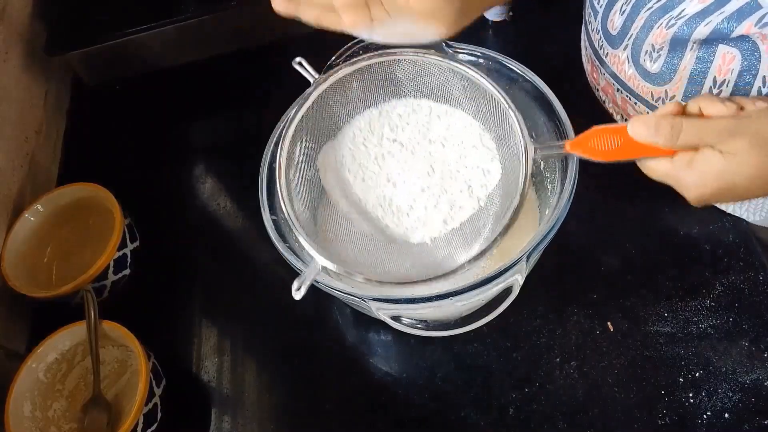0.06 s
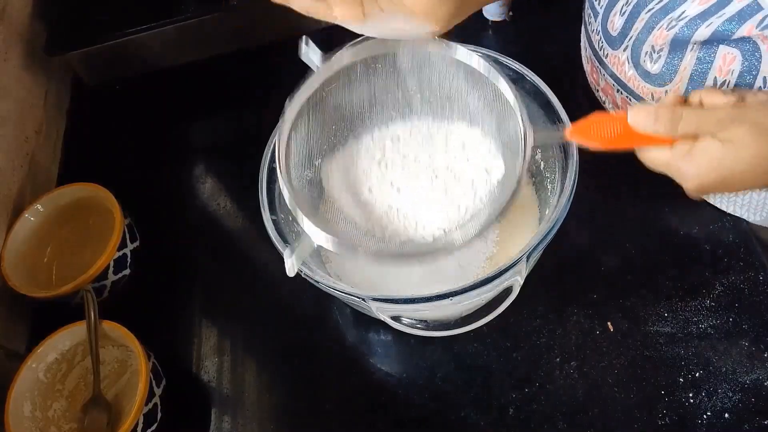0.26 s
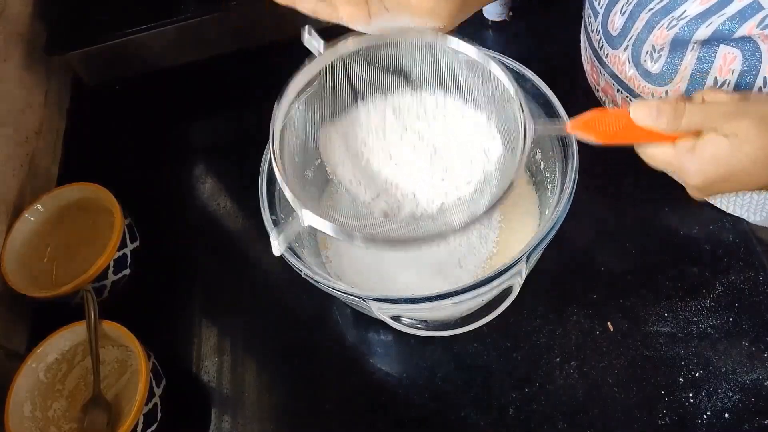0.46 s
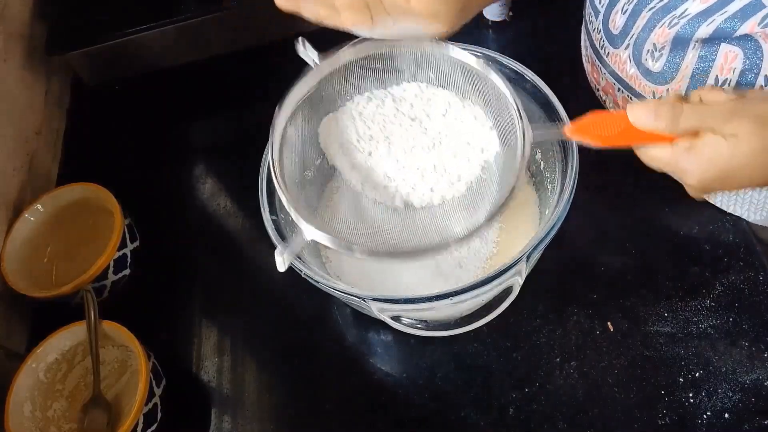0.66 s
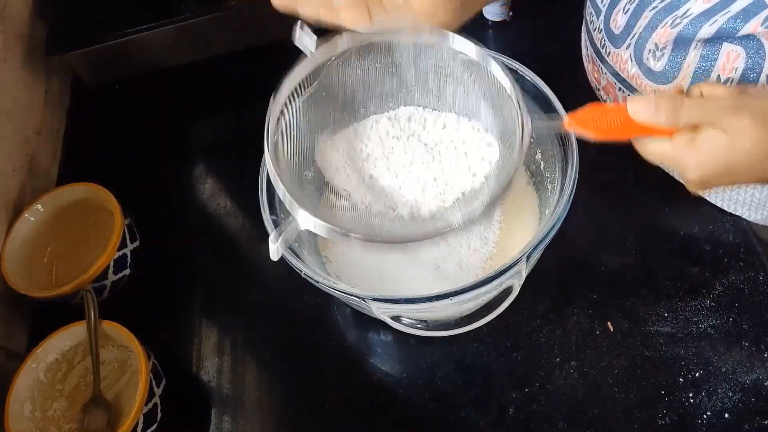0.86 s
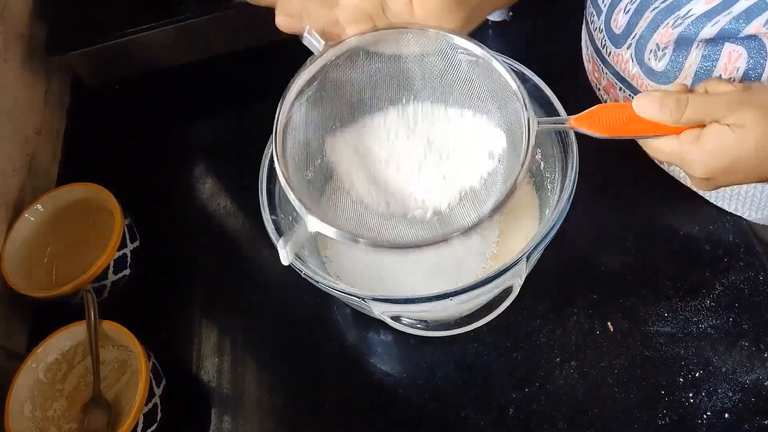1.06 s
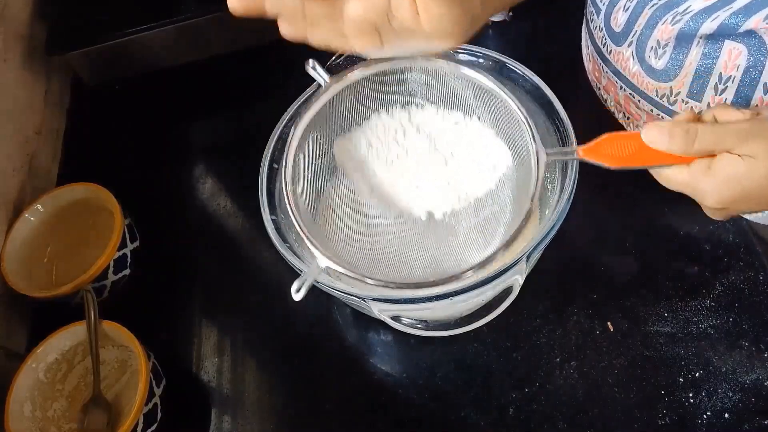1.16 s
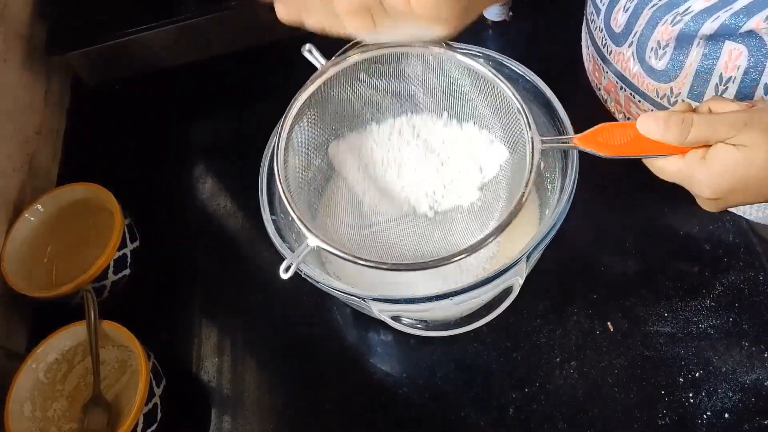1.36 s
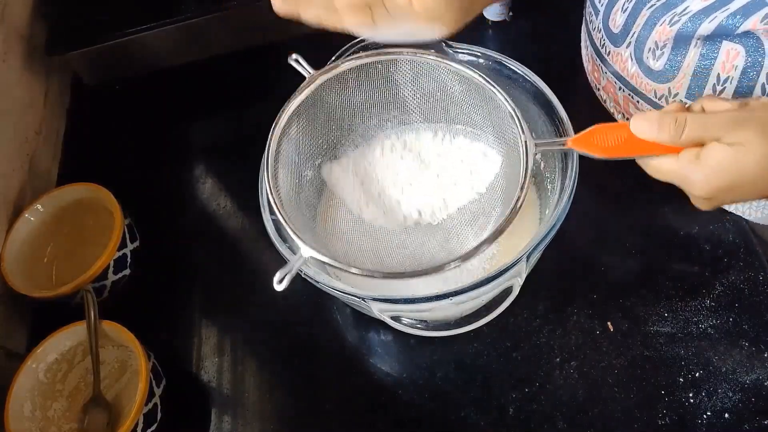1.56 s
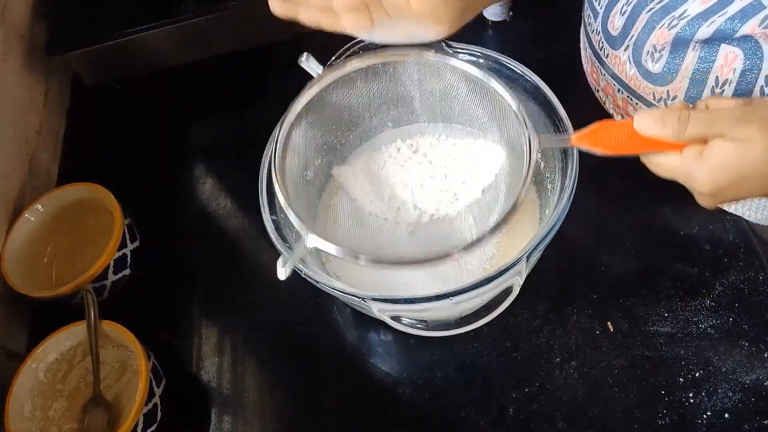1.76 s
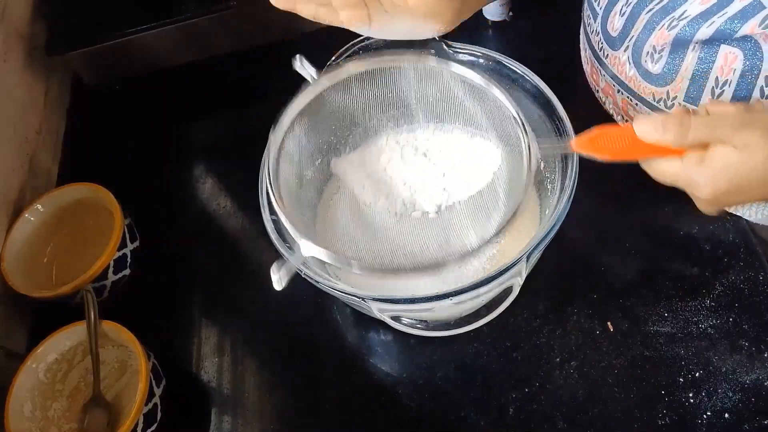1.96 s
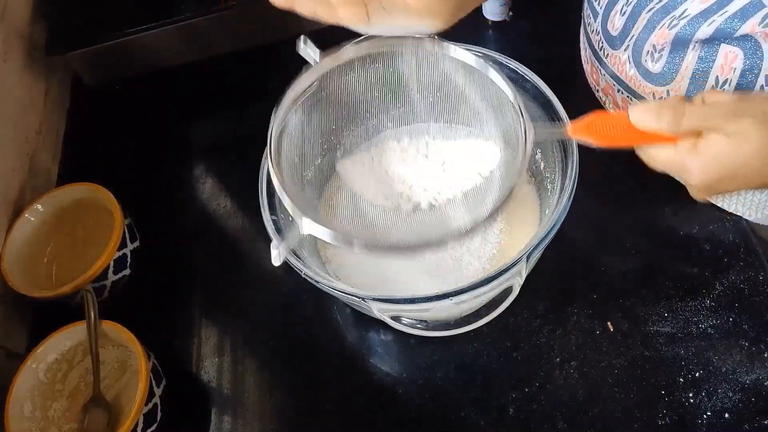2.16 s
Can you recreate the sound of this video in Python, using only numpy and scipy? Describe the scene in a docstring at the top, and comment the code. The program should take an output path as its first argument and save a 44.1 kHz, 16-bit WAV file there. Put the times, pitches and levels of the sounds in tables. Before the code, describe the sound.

Flour is sifted through a steel mesh sieve, close up in a small kitchen. Bright gritty swishes begin at once; at 0.25 seconds the rim hits the glass bowl with a loud, sharp, rattling clink that dies within about 0.2 seconds. A weaker shake follows near 0.55, then steady crisp swishes with faint dull palm thuds about every 0.2 seconds until 2.1, over faint room hum.

```python
"""Sifting flour over a bowl

Flour is sifted over a glass bowl in a small kitchen. A steel sieve is knocked against a palm several times a second:
soft thuds are bursts of dull noise, and bright, grainy swishes are showers of tiny random impacts on the mesh.
Once the rim strikes the bowl: a few sharp clicks, dying sine rings, a dense noisy tail and two low thuds.
The room adds a short echo and a faint hum of filtered noise."""
import sys
import numpy as np
from scipy import signal
from scipy.fft import rfft, irfft
from scipy.io import wavfile

SR = 44100
rng = np.random.default_rng(int(sys.argv[2]) if len(sys.argv) > 2 else 0)


def dump(signal):
    """Clip the signal to [-1, 1] and save it as 16-bit WAV at the path in sys.argv[1]."""
    limited = np.clip(np.atleast_2d(signal).T, -1, 1)
    pcm = np.round(limited * 32767).astype(np.int16)
    wavfile.write(sys.argv[1], SR, pcm)


N = 97020  # length in samples: 2.2 s


def from_db(db):
    """Turn decibels into a gain."""
    return 10 ** (np.asarray(db) / 20)


def rms_one(x):
    """Scale a signal to an rms (average strength) of 1."""
    return x / np.sqrt(np.mean(x ** 2) + 1e-20)


def coloured(x, points):
    """Filter a sound to follow a table of (pitch_hz, level_db), with a response of unit energy."""
    size = 8192
    pitch_hz, level_db = np.transpose(points)
    grid_hz = np.maximum(np.arange(size // 2 + 1) * SR / size, 1)
    gain = from_db(np.interp(np.log(grid_hz), np.log(pitch_hz), level_db))
    # fold the cepstrum onto positive times, so that the filter responds only after its input
    cepstrum = irfft(np.log(gain))
    cepstrum[1:size // 2] *= 2
    cepstrum[size // 2 + 1:] = 0
    response = irfft(np.exp(rfft(cepstrum)))
    return signal.fftconvolve(x, response / np.linalg.norm(response))[:N]


def ringing(x, modes):
    """Let each mode (one way of vibrating) ring as a dying sine whenever it is struck."""
    out = np.zeros(N)
    for pitch_hz, level_db, ring_s in modes:
        decay = from_db(-60 / (ring_s * SR))  # loss per sample
        turn = 2 * np.pi * pitch_hz / SR  # radians per sample
        feedback = [1, -2 * decay * np.cos(turn), decay * decay]
        out += from_db(level_db) * signal.lfilter([0, np.sin(turn)], feedback, x + 1e-18)
    return out


def swell(start_s, rise_s, hold_s, fall_s):
    """Climb 20 dB per rise time up to the start, hold, then lose 20 dB in each fall time."""
    t = np.arange(N) / SR - start_s
    before = np.maximum(-t, 0) / rise_s
    after = np.maximum(t - hold_s, 0) / fall_s
    return from_db(-20 * (before + after))


def joined_swells(table):
    """Add up the power of all swells in a table, and return the combined strength."""
    power = 0
    for start_s, rise_s, hold_s, fall_s, level_db in table:
        power = power + (from_db(level_db) * swell(start_s, rise_s, hold_s, fall_s)) ** 2
    return np.sqrt(power)


def grains(per_s, spread_db):
    """Scatter tiny impulses of uneven size and random sign, with an rms of 1."""
    sizes = from_db(spread_db * np.minimum(rng.exponential(1, N), 4))
    signs = rng.choice([-1, 1], N)
    lands = rng.random(N) < per_s / SR
    return rms_one(sizes * signs * lands)


def flutter(hz):
    """Smooth noise into a random wavering with a spread of 1."""
    low_pass = signal.butter(2, hz, fs=SR, output="sos")
    return rms_one(signal.sosfilt(low_pass, rng.standard_normal(N)))


# Colour of the still air of the kitchen: (pitch_hz [Hz], level_db [dB, relative])
HUM_COLOUR = [(20, -19), (45, -25.5), (70, -10), (105, 1), (170, -4.5), (300, -3.5), (460, -15), (800, -11),
              (1400, -16), (2500, -21), (5000, -22.5), (6500, -24), (8500, -43), (15500, -35.5)]
HUM_DB = -59


def room_hum():
    """The still air of the kitchen is faint, steady filtered noise."""
    return from_db(HUM_DB) * coloured(rng.standard_normal(N), HUM_COLOUR)


# Flour thrown across the mesh:
# (start_s [s, at full flow], rise_s [s per 20 dB], hold_s [s], fall_s [s per 20 dB], level_db [dB])
FLOUR_SHAKES = [(0.025, 0.039, 0.0063, 0.035, -37), (0.081, .008, 0.0044, 0.022, -48.5),
                (0.179, 0.018, 0.0086, 0.055, -42.5), (0.2, 0.031, 0.016, .055, -36.5),
                (0.534, 0.0095, 0.015, 0.07, -56.5), (0.595, 0.054, 0.042, 0.067, -61.5),
                (0.768, 0.016, 0.024, 0.03, -39.5), (0.93, 0.014, 0.051, 0.023, -35),
                (1.118, 0.021, 0.011, 0.028, -41.5), (1.158, 0.0081, 0.0033, 0.087, -53),
                (1.31, 0.0098, 0.0099, 0.033, -47.5), (1.34, 0.032, 0.014, 0.034, -37),
                (1.507, 0.015, 0.012, 0.035, -43), (1.531, 0.018, 0.0061, 0.047, -37.5),
                (1.686, 0.014, 0.039, 0.028, -39.5), (1.892, 0.04, 0.009, 0.039, -46),
                (1.959, 0.06, 0.013, 0.05, -59), (2.071, 0.023, 0.029, 0.043, -38)]
# Colour of flour on the mesh: (pitch_hz [Hz], level_db [dB, relative])
MESH_COLOUR = [(300, -25), (1000, -27.5), (2200, -25), (3000, -19.5), (3900, -11), (4600, -11),
               (5400, -7.5), (6050, -2.5), (6500, 4.5), (6850, -2), (7250, -4), (7750, -23.5), (8800, -33),
               (11000, -36.5), (15500, -42.5)]
GRAINS_PER_S, GRAIN_SPREAD_DB = 5000, 1.5
FLOW_FLUTTER_DB, FLUTTER_HZ = 0.5, 120


def flour():
    """Each shake drives a shower of grains over the wires, whose colour is bright."""
    flow = joined_swells(FLOUR_SHAKES)
    wavering = from_db(FLOW_FLUTTER_DB * flutter(FLUTTER_HZ))
    shower = flow * grains(GRAINS_PER_S, GRAIN_SPREAD_DB) * wavering
    return coloured(shower, MESH_COLOUR)


# Low thuds of the frame against the palm, and two under the clink: (start_s [s], level_db [dB, relative])
LOW_THUDS = [(0.015, -57), (0.187, -57), (0.255, -48.5), (0.293, -50), (0.568, -60.5), (0.773, -56),
             (0.925, -57), (0.968, -57), (1.147, -57), (1.341, -53), (1.535, -58.5), (1.715, -56),
             (1.903, -60.5), (2.094, -58.5)]
# Colour of a thud: (pitch_hz [Hz], level_db [dB, relative])
THUD_COLOUR = [(40, -29), (80, -1), (130, 1.5), (220, -3.5), (320, 0.5), (480, -10), (850, -9),
               (1500, -21.5), (4000, -63.5)]
THUD_RISE_S, THUD_T60_S = 0.00803, 0.23  # time constant of the rise; time to die by 60 dB


def low_thuds():
    """Soft, dull thuds, on the palm and under the clink: noise that builds quickly and dies away."""
    t, push = np.arange(N) / SR, 0
    for start_s, level_db in LOW_THUDS:
        age_s = np.maximum(t - start_s, 0)
        rise = 1 - np.exp(-age_s / THUD_RISE_S)
        decay = np.exp(-np.log(1000) * age_s / THUD_T60_S)
        push = push + from_db(level_db) * 2 * rise * decay
    return coloured(push * rng.standard_normal(N), THUD_COLOUR)


# The rim strikes the bowl and rebounds: (start_s [s], level_db [dB, relative])
RIM_STRIKES = [(0.2485, 4.5), (0.25, 10), (0.2512, 5), (0.2531, 8), (0.257, 2), (0.2589, 4.5)]
# The clink's dense, noisy tail holds, then dies quickly:
# (start_s [s, at full strength], rise_s [s per 20 dB], hold_s [s], fall_s [s per 20 dB], level_db [dB])
CLINK_TAILS = [(0.254, .002, .012, .05, -22.5), (0.289, 0.052, 0.037, 0.048, -23),
               (0.353, .03, .024, 0.028, -35)]
# Colour of the crack of steel on glass: (pitch_hz [Hz], level_db [dB, relative])
CRACK_COLOUR = [(35, -55), (100, -59.5), (400, -30.5), (620, -16), (950, -36), (1250, -13.5), (1450, -21.5),
                (1800, -10.5), (2650, -26), (3100, -6.5), (3400, -22), (4300, -18), (4850, -19.5),
                (5500, -14.5), (5850, 0), (6600, 0.5), (7150, 0.5), (7700, -18.5), (8200, -20), (8700, -30),
                (11000, -28), (12200, -33.5), (13200, -28), (13900, -39), (15200, -34.5)]
# Rings of rim and bowl: (pitch_hz [Hz], level_db [dB, relative], ring_s [s, to die by 60 dB])
RIM_RINGS = [(106.4, -64, .2), (353, -69, 0.04), (627, -58.5, 0.32), (1230, -54, 0.24), (1608, -46, 0.25),
             (1719, -43, 0.31), (1975, -54.5, 0.11), (2263, -44.5, 0.15), (3045, -42, 0.097),
             (3086, -36.5, 0.2), (4440, -60, .18), (4640, -45.5, 0.22), (5812, -30, .18),
             (6500, -36.5, .14), (6760, -45, 0.16), (6990, -37, 0.2), (7210, -44.5, 0.143)]
TAIL_IMPULSES_PER_S, TAIL_SPREAD_DB = 5000, 0.9
BLOW_RING_DB, TAIL_RING_DB = 10.5, -9.5  # how hard each one drives the rings


def clink():
    """Steel cracks on glass and rebounds; the first blow and the noisy tail drive the rings."""
    contacts, blow = np.zeros(N), np.zeros(N)
    for start_s, level_db in RIM_STRIKES:
        contacts[int(start_s * SR)] += from_db(level_db)
    blow[int(RIM_STRIKES[0][0] * SR)] = 1
    noisy_tail = joined_swells(CLINK_TAILS) * grains(TAIL_IMPULSES_PER_S, TAIL_SPREAD_DB)
    crack = coloured(contacts + noisy_tail, CRACK_COLOUR)
    drive = blow * from_db(BLOW_RING_DB) + noisy_tail * from_db(TAIL_RING_DB)
    return crack + ringing(drive, RIM_RINGS)


ROOM_T60_S, ROOM_TREBLE_T60_S = 0.33, 0.17  # time to die by 60 dB, below and above the split
ROOM_SPLIT_HZ, ROOM_BUILD_S = 9700, 0.008


def kitchen(x):
    """The room gives a diffuse echo, a tail of dying noise; its top dies sooner."""
    t, white = np.arange(SR) / SR, rng.standard_normal(SR)
    tail = 0
    for kind, t60_s in (("low", ROOM_T60_S), ("high", ROOM_TREBLE_T60_S)):
        split = signal.butter(4, ROOM_SPLIT_HZ, kind, fs=SR, output="sos")
        tail = tail + signal.sosfilt(split, white) * np.exp(-np.log(1000) * t / t60_s)
    tail = tail * (1 - np.exp(-t / ROOM_BUILD_S))
    return signal.fftconvolve(x, tail / np.linalg.norm(tail))[:N]


SHAKE_ROOM_DB, CLINK_ROOM_DB = -19, -21  # how much of each sound feeds the echo


def scene():
    """Sieve, hand and bowl sound close by, in the kitchen."""
    hum = room_hum()
    sifting = flour() + low_thuds()
    hit = clink()
    echo = kitchen(from_db(SHAKE_ROOM_DB) * sifting + from_db(CLINK_ROOM_DB) * hit)
    return (sifting + hit + echo + hum)[None]


CUTOFF_HZ = 15900


def record(dry):
    """The highest peaks are rounded and the top of the treble is cut."""
    rounded = dry / (1 + (dry / .85) ** 6) ** (1 / 6)  # stays below 0.85
    low_pass = signal.ellip(10, .1, 70, CUTOFF_HZ, fs=SR, output="sos")
    return signal.sosfilt(low_pass, rounded)


dry = scene()
out = record(dry)
dump(out)
```